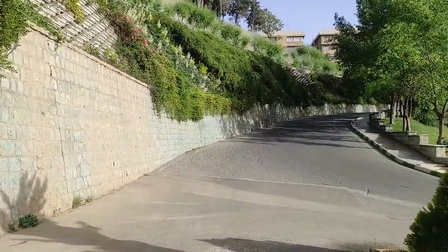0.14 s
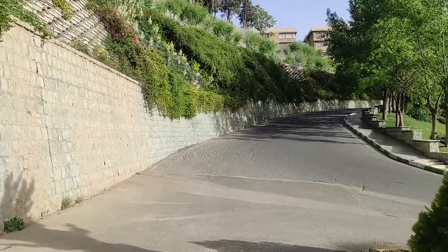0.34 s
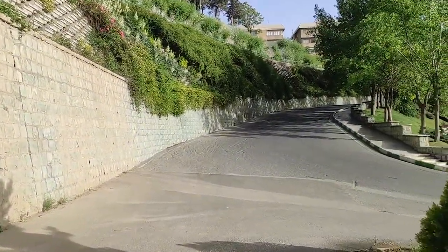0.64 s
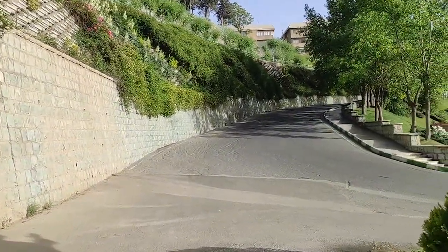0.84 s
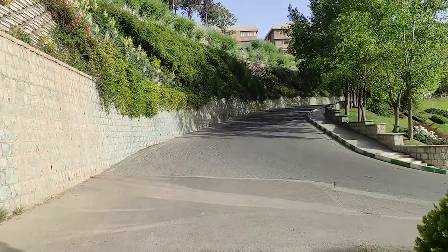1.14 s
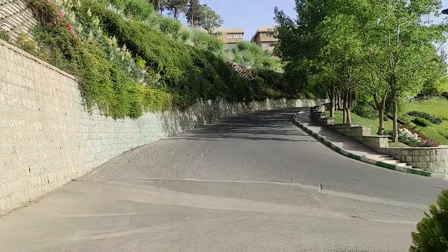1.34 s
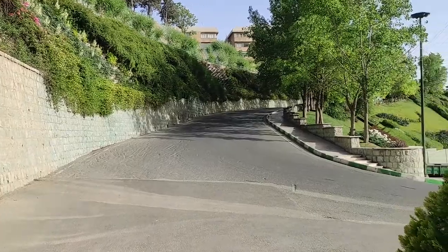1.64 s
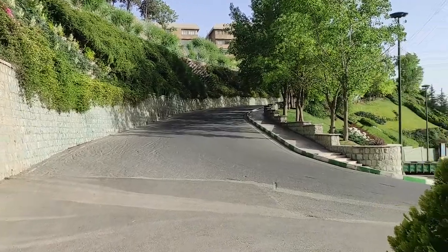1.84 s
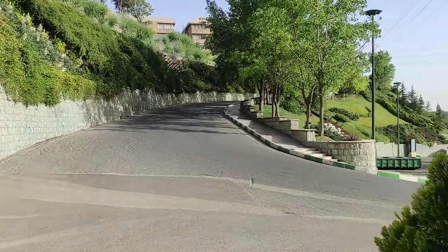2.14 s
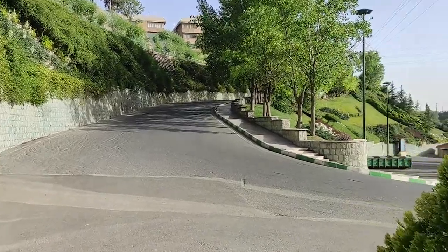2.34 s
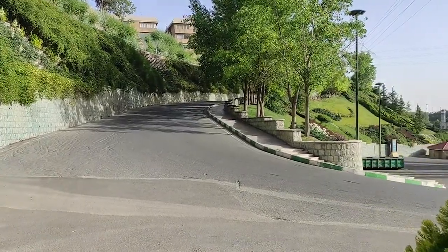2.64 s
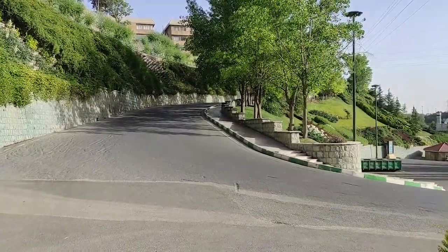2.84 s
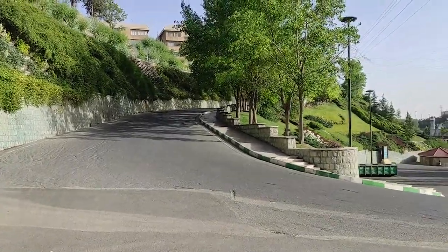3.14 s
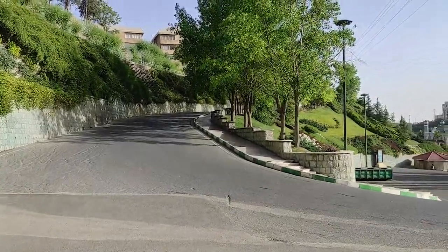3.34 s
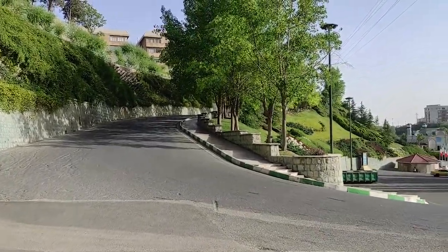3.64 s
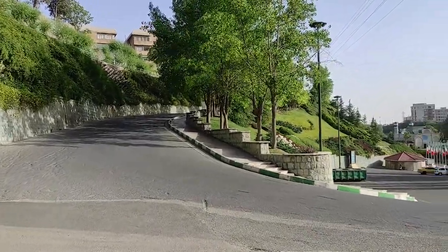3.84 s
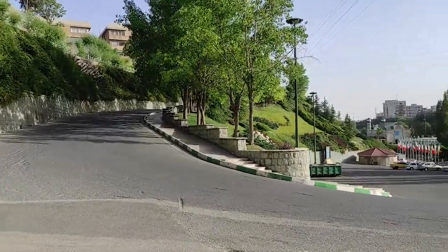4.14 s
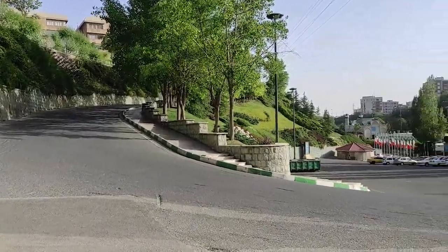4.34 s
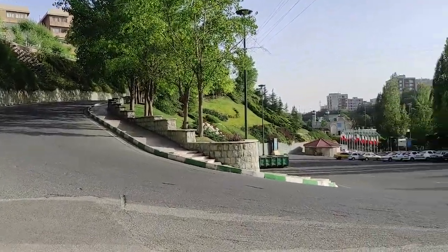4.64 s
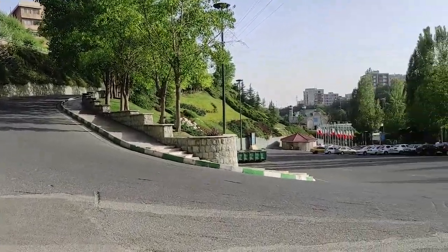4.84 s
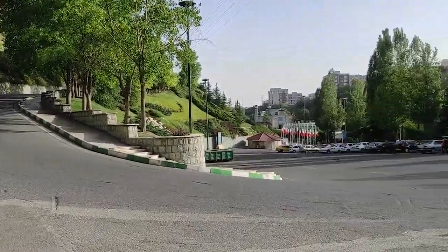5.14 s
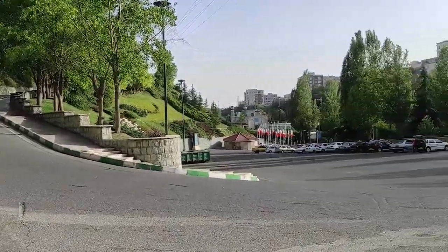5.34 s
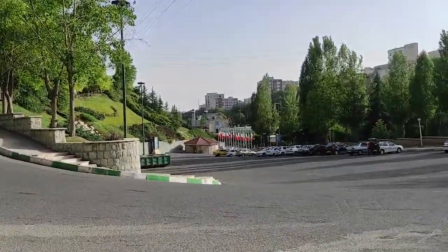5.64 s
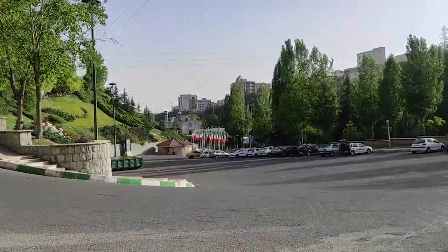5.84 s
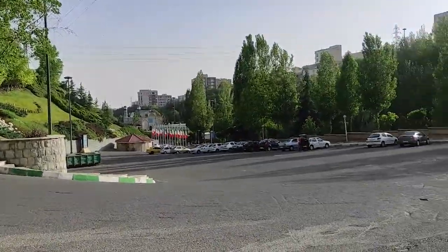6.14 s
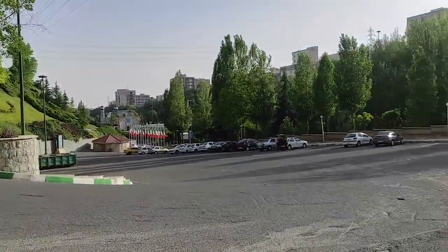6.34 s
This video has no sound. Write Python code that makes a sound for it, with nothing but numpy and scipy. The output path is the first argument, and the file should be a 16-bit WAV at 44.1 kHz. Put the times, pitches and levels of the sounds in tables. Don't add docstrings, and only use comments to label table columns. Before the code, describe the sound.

Water from a hose sweeps from plants to paved ground close to a handheld stereo phone. Quiet, thin spray with wind puffs grows into dense spattering, fat drops smacking sharply and puddles drumming. A distant door thuds early in the change. The spray stays strong past five seconds, then drops back, with a brief caw and low engines far behind in the open air. The sound is bright, slightly grainy and leans between sides.

```python
import sys
import numpy as np
from scipy import signal
from scipy.fft import rfft, irfft
from scipy.io import wavfile
from scipy.ndimage import uniform_filter1d, map_coordinates

SR = 44100
rng = np.random.default_rng(int(sys.argv[2]) if len(sys.argv) > 2 else 0)


def materialize(psi):
    bounded = np.clip(np.atleast_2d(psi).T, -1, 1)
    quanta = np.round(bounded * 32767).astype(np.int16)
    wavfile.write(sys.argv[1], SR, quanta)


def invert_db(x):
    u = np.asarray(x, float) / 20
    return 10 ** u


N = 285768
T = np.arange(N) / SR
HZ = np.fft.rfftfreq(N, 1 / SR) + 1
PEAK_FROM_HZ, PEAK_TO_HZ = 5300, 8890


def curves(table):
    s, *columns = np.transpose(table)
    return [np.interp(T, s, c) for c in columns]


def unit(x):
    return x / np.sqrt(np.mean(x ** 2))


def colour(points):
    hz, db = np.transpose(points)
    return np.interp(np.log(HZ), np.log(hz), db)


def shape(x, points, share=0.85):
    return irfft(rfft(x) * invert_db(share * colour(points)), N)


def under(hz, order=8):
    return 1 / (1 + (HZ / hz) ** order)


def later(x, ms):
    return map_coordinates(x, [np.arange(N) - ms * SR / 1000], order=2, mode="nearest")


def walk(rate):
    k = max(int(SR / rate), 2)
    held = np.repeat(rng.standard_normal(N // 100), k)[:N]
    return unit(uniform_filter1d(held, k))


def swells(table, floor=0.):
    power = floor ** 2
    for s, length, db in table:
        power = power + invert_db(2 * db) * np.exp(-(2 * (T - s) / length) ** 2 * 2)
    return np.sqrt(power)


def noise_trio(points):
    return [unit(shape(rng.standard_normal(N), points)) for _ in range(3)]


# frequency in Hz, level in dB per Hz
TRAFFIC_COLOUR = [(18, -63), (30, 2.5), (96, -10.5), (174, -3.5), (282, -10), (333, -11.5), (456, -15),
                  (973, -31.5), (2500, -26), (3250, -43), (5500, -120)]
# middle in seconds, length in seconds, level in dB
CARS = [
    (2.2, 0.53, -47.5),
    (3.02, 0.13, -60),
    (3.7, 0.48, -47.5),
    (4.13, 0.12, -40.5),
    (6.42, 0.62, -49),
]


def traffic():
    shared, left, right = noise_trio(TRAFFIC_COLOUR)
    level = swells(CARS, invert_db(-51)) * invert_db(1.0 + 2.0 * walk(4.53))
    return level * (shared + 0.2 * np.array([left, right]))


# middle in seconds, length in seconds, level in dB, pitch in Hz
ENGINES = [
    (0.92, 1.25, -53.5, 89),
    (5.3, 1.3, -56, 49),
    (6.14, 1.1, -49, 57),
    (5, 0.26, -55.5, 66),
    (5.8, 0.64, -52, 90),
]


def engines():
    total = 0
    for s, length, db, hz in ENGINES:
        phase = 2 * np.pi * np.cumsum(hz * (1 + 0.048 * walk(6.4))) / SR
        total = total + swells([(s, length, db)]) * np.sin(phase) * invert_db(2.7 * walk(10.0))
    return total * invert_db(np.array([[2.5], [-1.5]]))


# frequency in Hz, level in dB
DOOR_COLOUR = [(25, -4), (60, -7), (150, -3), (350, -3), (600, -21), (900, -12), (1500, -30), (3000, -42)]


def door():
    start_s, level_db, t60_s = 2.122, -26.5, 0.23
    since = np.maximum(T - start_s, 0)
    envelope = (1 - np.exp(-since / 0.0016)) * invert_db(-60 * since / t60_s)
    return invert_db(level_db) * envelope * unit(shape(rng.standard_normal(N), DOOR_COLOUR))


# time in seconds, pitch in Hz, throat resonance in Hz, level in dB
BIRD = [
    (5.868, 362, 1450, -60),
    (5.882, 362, 1450, -42),
    (5.92, 380, 1520, -42),
    (5.935, 376, 1850, -41),
    (5.955, 390, 1940, -42),
    (5.975, 405, 2020, -46),
    (5.99, 410, 2080, -56),
]


def bird():
    pitch_hz, throat_hz, db = curves(BIRD)
    phase = 2 * np.pi * np.cumsum(pitch_hz * (1 + 0.027 * walk(150.))) / SR
    width_hz = 160.0
    call = 0
    for k in range(3, 9):
        call = call + np.sin(k * phase) / np.hypot(1, (k * pitch_hz - throat_hz) / width_hz) ** 2
    hoarse = invert_db(db + 5.5 + 4.5 * walk(120.))
    call = call * hoarse * (T > BIRD[0][0]) * (T < BIRD[-1][0])
    return np.array([call, later(call, 0.098)])


# frequency in Hz, level in dB per Hz
AIR_COLOUR = [(900, -12), (1800, -10), (4500, 5), (6000, 9), (8500, 4), (10000, 0.5), (12500, -8.5),
              (15500, -12)]


def air():
    shared, left, right = noise_trio(AIR_COLOUR)
    return invert_db(-54.0 + 0.12 * walk(23.0)) * (shared + 1.72 * np.array([left, right]))


# middle in seconds, length in seconds, level in dB
PUFFS = [(.25, 0.63, -39), (.8, 0.21, -42), (1.2, 0.12, -44), (1.8, 0.12, -46), (2.15, 0.085, -35),
         (2.3, 0.13, -40), (2.5, .14, -39), (2.63, 0.074, -43), (2.89, 0.1, -33), (3.0, 0.12, -36.5),
         (3.2, 0.28, -49), (3.59, 0.1, -36), (3.76, 0.14, -34), (4.13, 0.15, -40.5), (1.1, .1, -43)]


def wind():
    puff = [(8, 1.0), (20, 6), (32, -8.5), (48, -0.5), (80, -14.5), (200, -32), (400, -53)]  # (Hz, dB)
    ports = [unit(shape(rng.standard_normal(N), puff)) * invert_db(4.0 * walk(15.0)) for _ in range(2)]
    breeze_db = -49
    return swells(PUFFS, invert_db(breeze_db)) * invert_db(np.array([[0.5], [-10.]])) * ports


# frequency in Hz, level in dB
SMACK_COLOUR = [(500, -51), (1500, -21), (4500, -15), (6000, -7), (6900, 4), (8000, -2.5), (9200, -9),
                (11000, -53)]
# start in seconds, peak in dB
FAT_DROPS = [(.0925, -23), (2.138, -22), (2.351, -20), (2.584, -24), (2.7112, -22), (2.9577, -22),
             (3.0135, -19), (3.0784, -20), (3.1904, -17), (3.238, -23), (3.3124, -17), (3.387, -23),
             (3.418, -16), (3.4496, -17), (3.8015, -19), (3.831, -19), (3.8521, -15), (4.0677, -20),
             (4.079, -20), (4.1444, -20), (4.2557, -14), (4.2585, -17), (4.27, -20), (4.282, -21),
             (4.316, -19), (4.3258, -9), (4.343, -20), (4.357, -19), (4.4154, -21), (4.4787, -18),
             (4.5312, -20), (4.5403, -19), (4.553, -19), (4.591, -18), (4.6128, -19), (4.642, -20),
             (4.674, -18), (4.755, -24), (4.9494, -20), (5.0194, -19), (5.051, -19), (5.093, -18),
             (5.1377, -19), (5.2959, -24), (5.434, -17), (5.7179, -25), (5.7803, -24), (5.965, -24),
             (6.0457, -24), (6.1025, -22), (6.4457, -13)]


def fat_drops():
    clicks = np.zeros(N)
    for s, db in FAT_DROPS:
        clicks[int(s * SR) + 30] = invert_db(db)
    ring = shape(np.arange(N) == 0, SMACK_COLOUR)
    return invert_db(12.0) * shape(clicks, SMACK_COLOUR) / ring[0]


# start in seconds, peak in dB, ring in Hz
SPLASHES = [
    (2.342, -30, 1050),
    (2.36, -37, 1110),
    (2.375, -28, 1160),
    (2.386, -36, 1020),
    (2.403, -22, 1030),
    (2.407, -28, 960),
    (2.425, -41, 1420),
    (2.446, -40, 1130),
    (2.462, -31, 1150),
    (2.522, -26, 2140),
]


def splashes():
    t60_s, overtone_db = .025, -6
    out = np.zeros(N)
    since = T[:4000]
    for s, db, hz in SPLASHES:
        ring = np.sin(2 * np.pi * hz * since)
        ring = ring + invert_db(overtone_db) * np.sin(2 * np.pi * 1.9 * hz * since)
        out[int(s * SR):][:len(since)] += invert_db(db - 60 * since / t60_s) * ring
    return out


def drops(per_s, scatter_db, mist_db):
    when, size, sign = rng.random((N // 4, 3))[:int(per_s * N / SR)].T
    size_db = np.minimum(-scatter_db * np.log(1 - size), 11.5)
    clicks = np.bincount((when * N).astype(int), invert_db(size_db) * np.sign(sign - .5), N)
    return unit(clicks) + invert_db(mist_db) * rng.standard_normal(N)


# frequency in Hz, level in dB per Hz
DROP_COLOUR = [(120, -21.5), (300, -3.5), (1000, 1.5), (3000, -10), (5000, -10.5), (6000, -4.5),
               (7000, 2.5), (7500, -1), (8500, -6.5), (9200, -7.5), (9700, -16.5), (12000, -17.5),
               (15500, -21)]
LANDING_EDGES_HZ = (954, 1964, 5830)


def landing(heard_by_all, own_db, flicker_db):
    steps = np.array([0 * HZ, *(under(hz) for hz in LANDING_EDGES_HZ), HZ ** 0])
    edges = invert_db(colour(DROP_COLOUR)) * steps
    parts = []
    for band in np.diff(edges, axis=0):
        own = invert_db(own_db) * drops(4000., 3.7, -1.7)
        x = irfft(rfft(heard_by_all + own) * band, N)
        parts.append(unit(x) * invert_db(flicker_db * walk(9.)))
    return np.array(parts)


# time in seconds, strength in dB, share that lands on pavement from 0 to 1
JET = [(0, -39, 0.06), (1.4, -39, 0.27), (2.0, -35.5, 0.18), (2.27, -36.5, 0.51), (2.29, -31, 0.3),
       (2.38, -30.5, 0.71), (2.53, -34.5, 0.7), (2.88, -33, 0.58), (3.02, -31, 0.85), (3.45, -29.5, 1),
       (3.62, -32, 1), (3.86, -25.5, 0.66), (3.92, -31, 0.9), (4.26, -27, 0.62), (4.36, -29.5, 0.64),
       (5.2, -28, 0.67), (5.6, -34.5, 0.87), (6.48, -33, 0.59)]
# middle in seconds, length in seconds, level in dB,
# depth from 0 to 1
PUDDLES = [
    (2.42, 0.13, -36, 0.12),
    (3.124, 0.25, -35.5, 0),
    (3.235, 0.35, -38.5, 0.7),
    (3.43, 0.2, -39.5, 0.02),
    (3.763, 0.61, -39.5, 0.3),
    (4.07, 0.69, -34.5, 0.85),
    (5.085, 0.092, -41, 1),
    (5.705, 0.81, -40, 0.64),
    (6.19, 0.83, -39, 0.13),
]


def landing_levels():
    jet_db, paved = curves(JET)
    # drumming, splash, patter and mist against the jet's strength (dB)
    leaves = np.array([[-20], [-21], [-16], [-3]])
    pavement = np.array([[-13], [-12], [1], [1.5]])
    level = invert_db(jet_db + leaves + np.clip(paved, 0, 1) * (pavement - leaves))

    def share_db(part):
        return 10 * np.log10(np.clip(part, .01, 1))

    deep = swells([(s, n, db + share_db(depth)) for s, n, db, depth in PUDDLES], level[0])
    shallow = swells([(s, n, db + share_db(1 - depth)) for s, n, db, depth in PUDDLES], level[1])
    return np.array([deep, shallow, level[2], level[3]])


# time in seconds, lead of the left port in ms, extra path via the ground in ms
TURN = [(0, 0.17, 1.04), (1, 0.13, 1.05), (1.8, 0.14, 1.05), (2.4, 0.14, 1.04), (2.62, 0.19, .95),
        (2.85, 0.23, 0.82), (3.2, 0.23, 0.88), (3.6, 0.28, 0.7), (3.9, .31, 0.69), (4.1, 0.32, 0.61),
        (4.5, 0.36, 0.85), (4.9, 0.363, 0.82), (5.3, 0.41, 0.77), (5.7, 0.4, 0.63), (6, 0.39, 0.54),
        (6.3, 0.39, 0.56), (6.48, 0.39, 0.63)]
# time in seconds, drumming and splash in dB, patter and mist in dB
BUSHES = [(0, 10, 9), (2.2, 9, 8), (2.45, 4, 8), (2.9, 5, 4), (3.3, 4, 1), (3.6, 3, 0), (3.78, -1, -1),
          (3.95, 3, 0), (4.25, 2, -3), (4.45, 2, 4), (4.85, 2, 3), (5.05, 2, -3), (5.25, 2, -2),
          (5.45, 3, 2), (5.75, 5, 3), (6.0, -2, 3), (6.3, -3, 3), (6.48, 1, 5)]


def spray():
    level = landing_levels() * invert_db(0.39 * walk(25.) + 1.24 * walk(90.))
    lead_ms, ground_ms = curves(TURN)
    direct = (landing(drops(4000., 3.3, -15.0), 4.2, 1.22) * level).sum(0)
    direct = direct + fat_drops() + splashes()
    direct = irfft(rfft(direct) * under(PEAK_TO_HZ, order=30), N)
    peak = irfft(rfft(direct) * (1 - under(PEAK_FROM_HZ, order=30)), N)
    body = direct - peak
    echo = later(body, ground_ms)
    left = body + 0.33 * echo + peak
    right = later(body + 0.061 * echo + peak, lead_ms)
    share_db = np.array([[-10.], [-9.], [-7.], [-5.]]) + np.repeat(curves(BUSHES), 2, axis=0)
    scattered = []
    for _ in range(2):
        diffuse = landing(rng.standard_normal(N), -1.3, 0.98)
        scattered.append((diffuse * level * invert_db(share_db)).sum(0))
    return invert_db(-3.0) * (np.array([left, right]) + scattered)


def scene():
    return traffic() + engines() + door() + bird() + air() + wind() + spray()


# time in seconds, then left minus right in dB in the low treble,
# at the microphone peak and at the top
SHADE = [(0, -2.5, -11, 1), (.6, -0.5, -5, 0.5), (1.2, -1, -3.5, 3), (2.5, -2, -3, -1), (3.2, -0.5, -6, -1),
         (3.9, -0.5, -4, -4.5), (4.3, 1.5, 1, 9), (4.8, 3, 2, 3), (5.15, -2, 7, 15), (5.45, -0.5, 10.5, 9),
         (5.75, 0, 11, 10), (6, 4, 10, 4), (6.2, 9, 4.5, 10), (6.48, 2.5, -1, 8)]
SHADE_EDGES_HZ = (2640, 5300, 9400, 12800)


def shaded(ports):
    spectrum, out = rfft(ports), ports
    low, peak, end, top = (under(hz, order=12) for hz in SHADE_EDGES_HZ)
    for band, db in zip((peak - low, end - peak, 1 - top), curves(SHADE)):
        lean = invert_db(np.array([db, -db]) / 2) - 1
        out = out + irfft(spectrum * band, N) * lean
    return out


# frequency in Hz, share in dB
DROPPED_UNDER = [(900, -30), (1500, -7), (2100, -5), (2600, -2.6), (4000, -1.4), (5800, -1.4), (6800, -3.5),
                 (8000, -2.8), (9000, -1.5), (9500, -.8), (10500, -.3), (15000, -.3)]
# frequency in Hz, ratio in dB
SUM_DROPPED_UNDER = [(1000, -14), (1150, -8), (1350, -10.5), (1700, -10), (2300, -9), (3000, -4),
                     (5600, -3.6), (6500, -7), (7000, -9), (9000, -4)]


def thinned(z, hz, chance):
    def smooth(x, bins):
        return abs(uniform_filter1d(uniform_filter1d(x, size=bins, axis=1), size=3, axis=2)) + 1e-20

    total, apart = z[0] + z[1], z[0] - z[1]
    power = smooth(abs(np.array([total, apart])) ** 2, 9)
    least = invert_db(2 * np.interp(hz, *np.transpose(SUM_DROPPED_UNDER)))[:, None]
    total = total * (power[0] > least * power[1] * (hz > 1000)[:, None])
    z = np.array([total + apart, total - apart]) / 2

    lines = abs(z) ** 2 + 1e-20
    around, group = smooth(lines, 40), smooth(lines, 5)
    buried_db = 10 * np.log10(around.max(axis=1, keepdims=True) / around)
    buried_db = buried_db - buried_db.mean(axis=(0, 2), keepdims=True)
    buried_db = uniform_filter1d(buried_db, size=9, axis=2).clip(-4, 4)
    share_db = np.interp(hz, *np.transpose(DROPPED_UNDER))[:, None] + .25 * buried_db
    kept = (group > invert_db(2 * share_db) * around) & (lines > invert_db(2 * (share_db - 3)) * group)

    loud_db = 10 * np.log10(around.max(axis=(0, 1)))
    empty_share = .13 + .022 * (loud_db - loud_db.mean())
    empty = (1 - chance < empty_share) & (hz > PEAK_TO_HZ)[:, None]
    makeup = np.sqrt(np.minimum(around / smooth(lines * kept + 1e-20, 40), 2.5))
    return z * kept * ~empty * makeup


# start in seconds, end in seconds, upper limit in Hz
APART = [
    (0.05, .7, 7600),
    (3.9, 4.33, 7600),
    (5.42, 6.1, 9600),
    (6.1, 6.48, 7000),
]


def joint_treble(ports):
    joint_hz, band_bins, patch_frames = 6870, 24, 3
    peak_share, top_share, opposed_share = .93, .7, .25
    hz, s, z = signal.stft(ports, SR, nperseg=2048)
    power = uniform_filter1d(abs(z) ** 2, size=band_bins, axis=1) + 1e-20
    shared = np.where(power[0] > power[1], z[0] / np.sqrt(power[0]), z[1] / np.sqrt(power[1]))
    chance = np.kron(rng.random((50, 100)), np.ones((band_bins, patch_frames)))[:len(hz), :len(s)]
    share = np.where(hz < PEAK_TO_HZ, peak_share, top_share)[:, None]
    joined = (chance < share) & (hz > joint_hz)[:, None]
    opposed = (chance < opposed_share * top_share) & (hz > PEAK_TO_HZ)[:, None]
    sides = np.array([np.ones(opposed.shape), np.where(opposed, -1., 1.)])
    for start, end, top_hz in APART:
        joined = joined & ~((hz < top_hz)[:, None] & (s > start) & (s < end))
    z = np.where(joined, sides * shared * np.sqrt(power), z)
    return signal.istft(thinned(z, hz, chance), SR)[1][:, :N]


def low_pass(x):
    return signal.sosfilt(signal.butter(12, 16470, fs=SR, output="sos"), x)


# frequency in Hz, left minus right in dB
PORT_BASS = [(20, -3), (300, 5.5), (1000, 2.5), (2500, 2), (5000, -1)]


def record(dry):
    ports = np.array([shape(dry[0], PORT_BASS, 0.6), shape(dry[1], PORT_BASS, -0.47)])
    ports = joint_treble(shaded(ports))
    top_cut = signal.ellip(10, .2, 80, 15830, fs=SR, output="sos")
    mix = signal.sosfilt(top_cut, ports)
    return low_pass(mix)


dry = scene()
out = record(dry)
materialize(out)
```